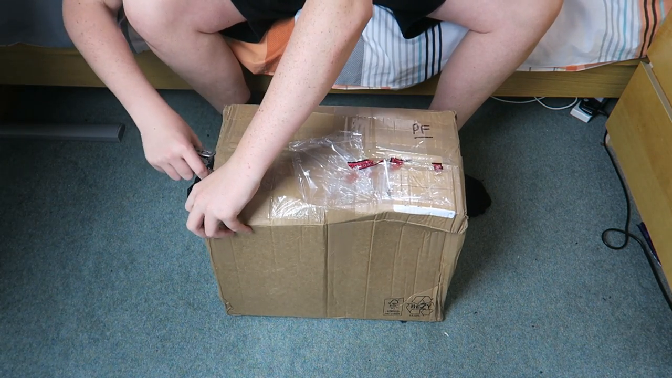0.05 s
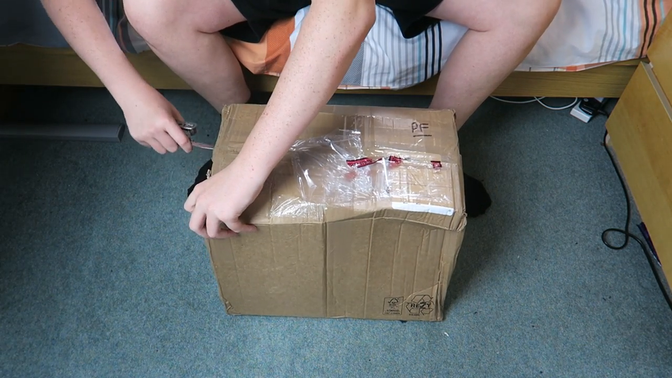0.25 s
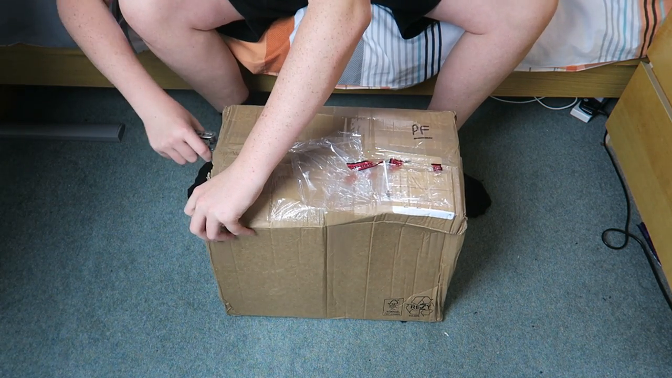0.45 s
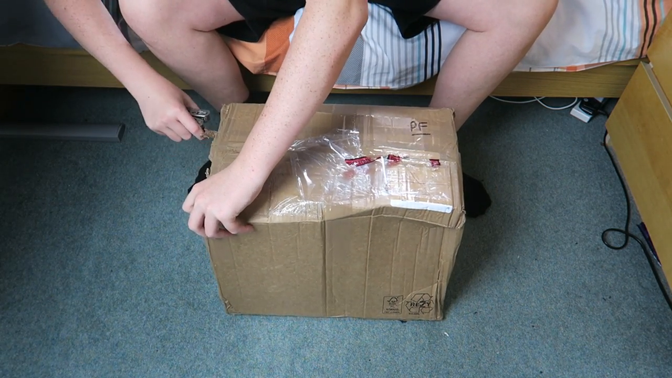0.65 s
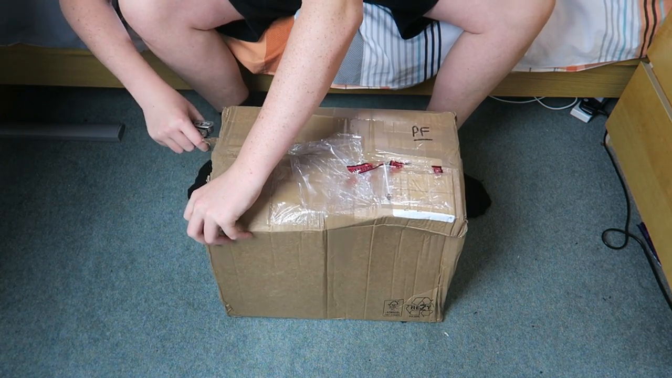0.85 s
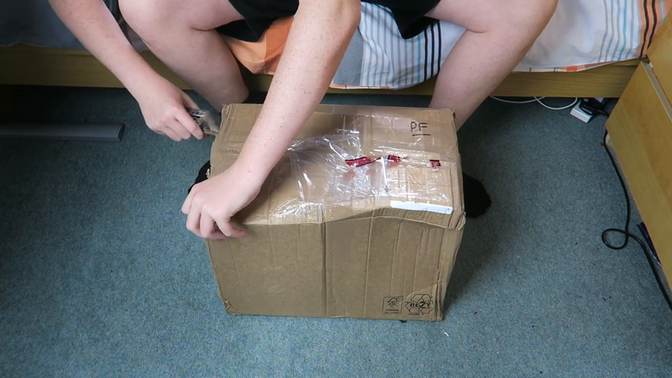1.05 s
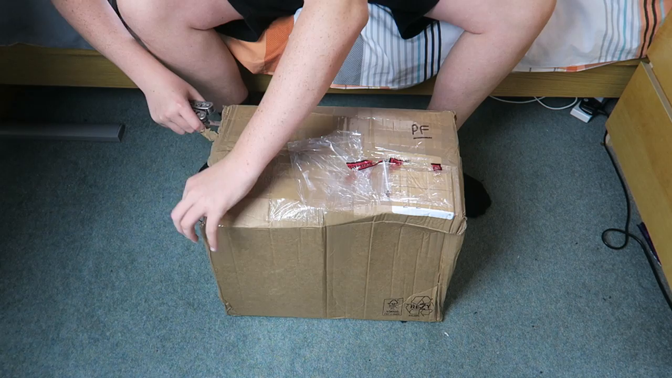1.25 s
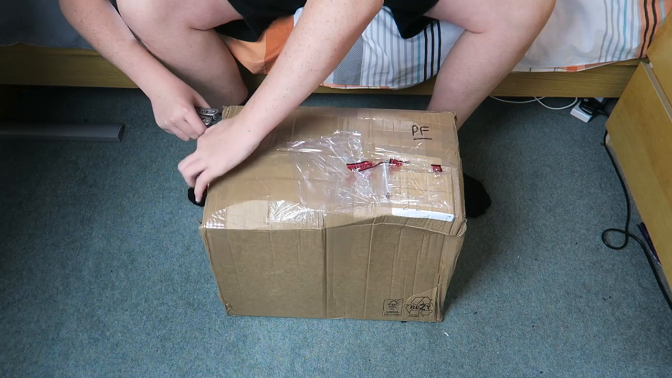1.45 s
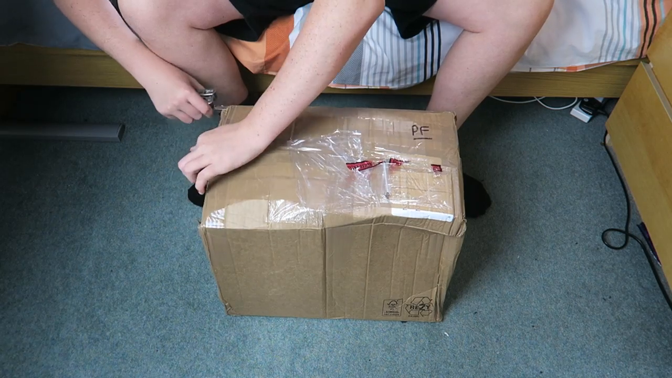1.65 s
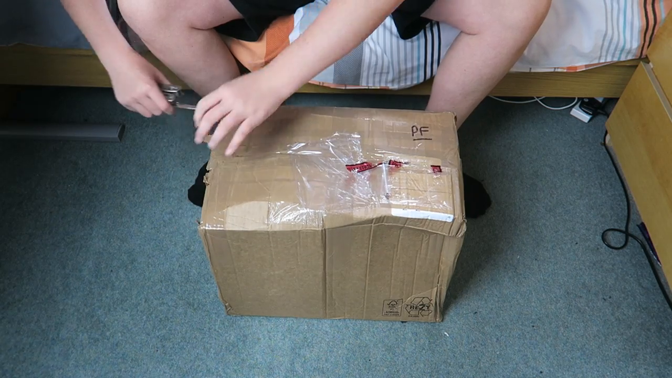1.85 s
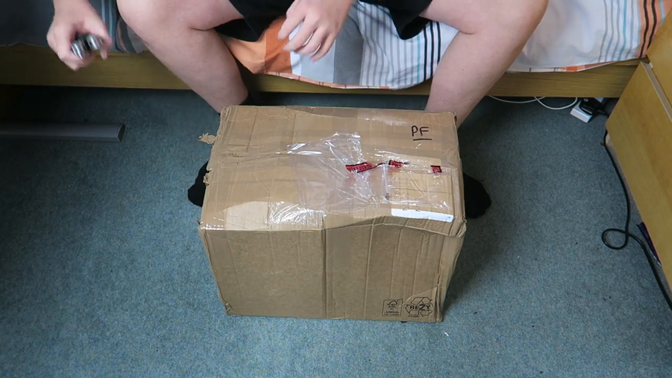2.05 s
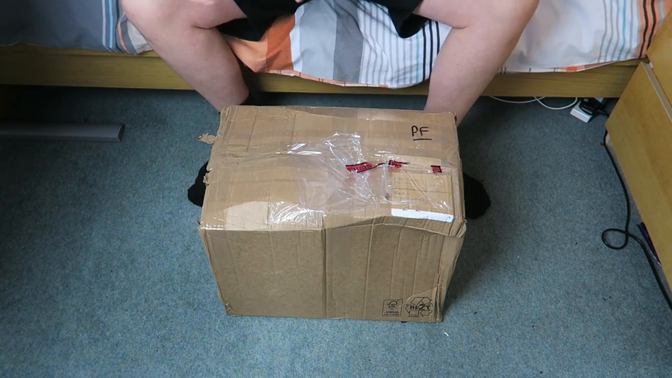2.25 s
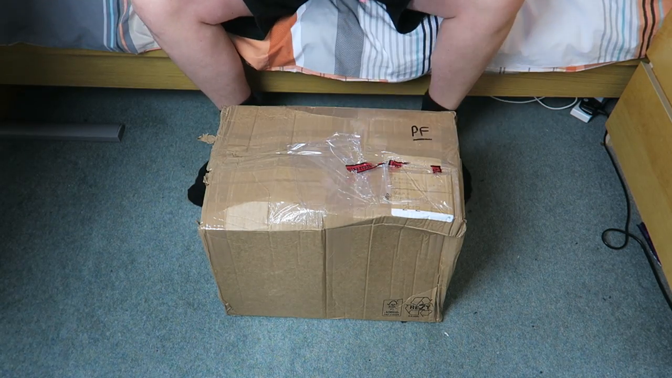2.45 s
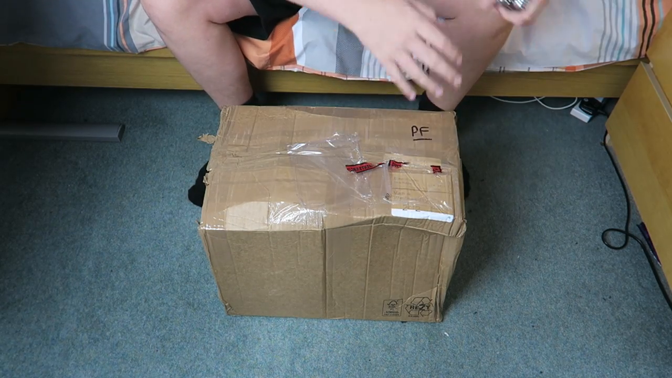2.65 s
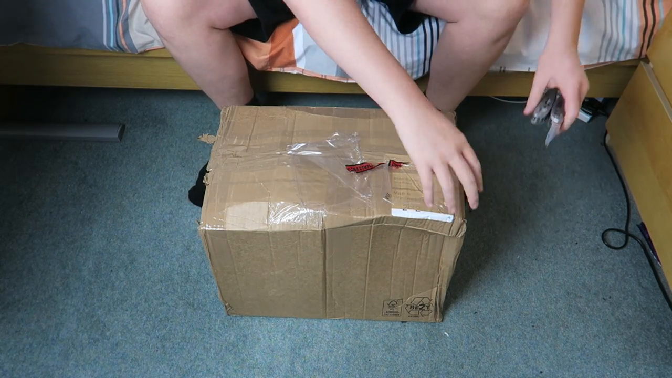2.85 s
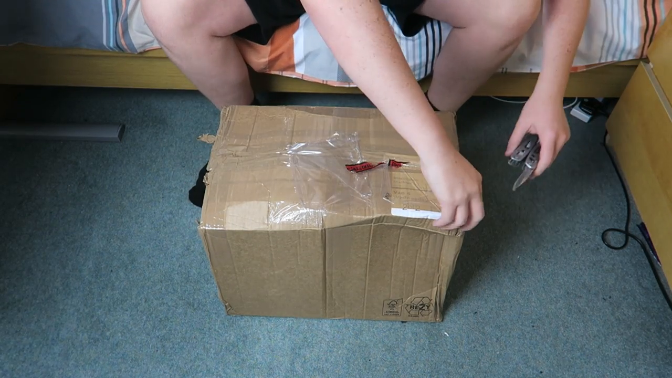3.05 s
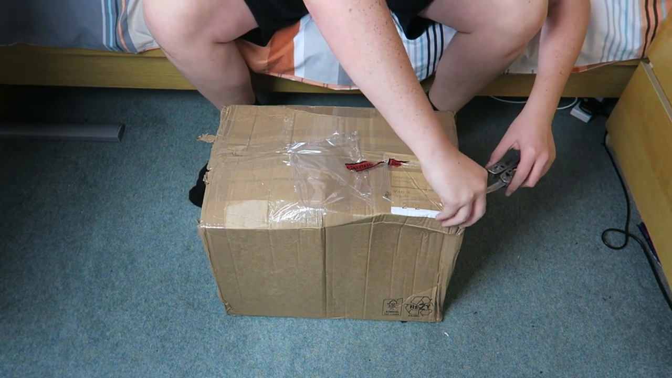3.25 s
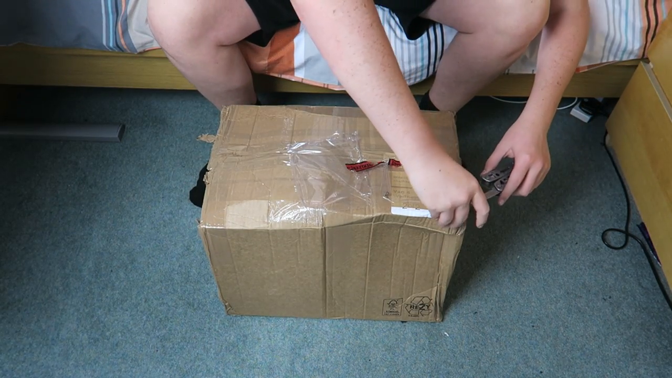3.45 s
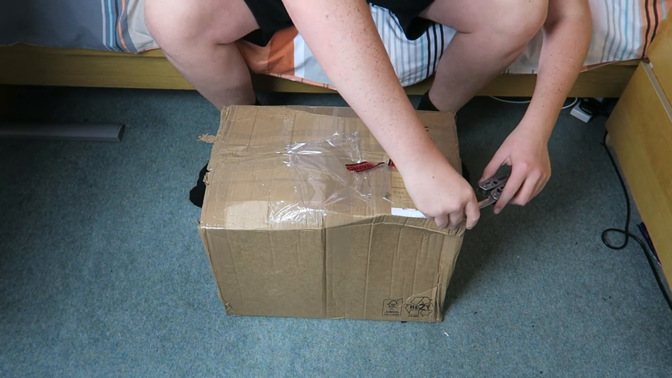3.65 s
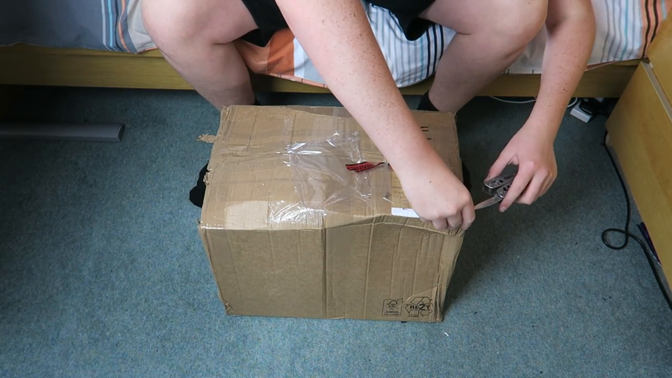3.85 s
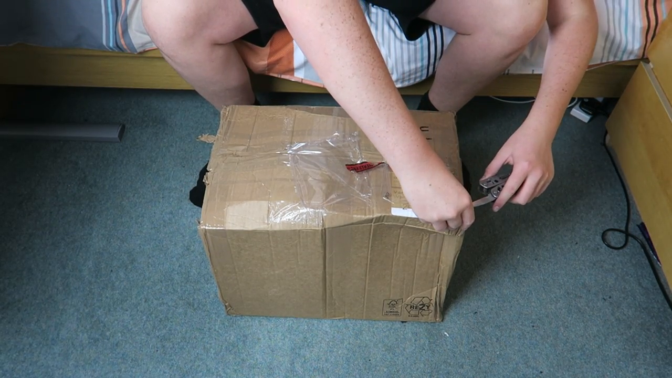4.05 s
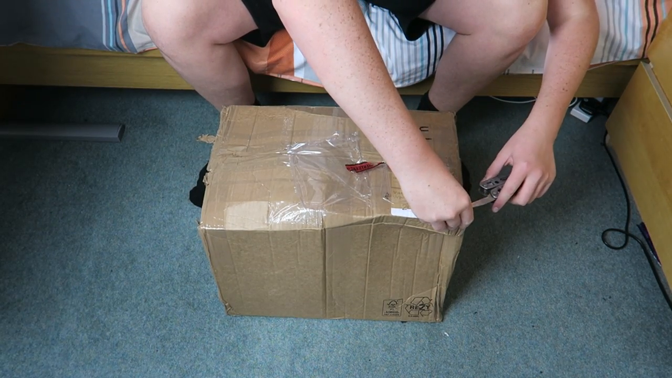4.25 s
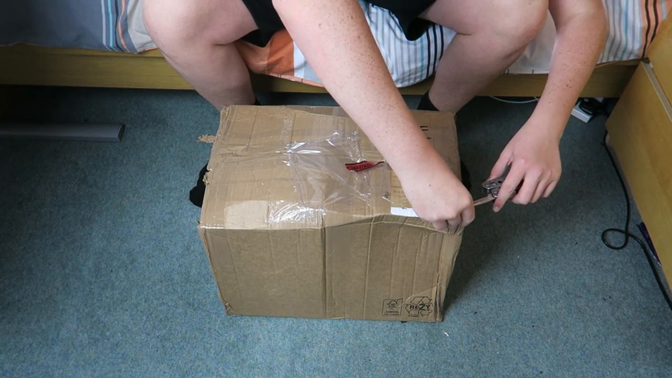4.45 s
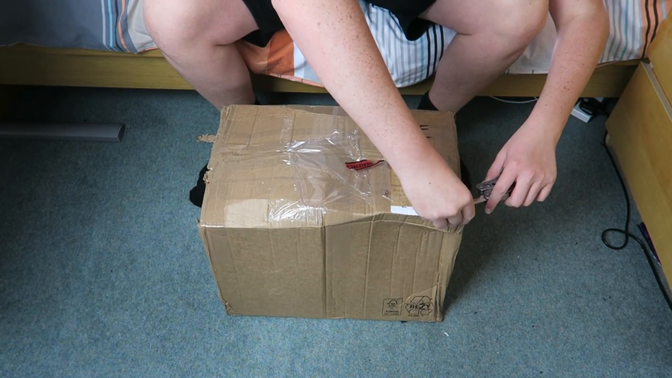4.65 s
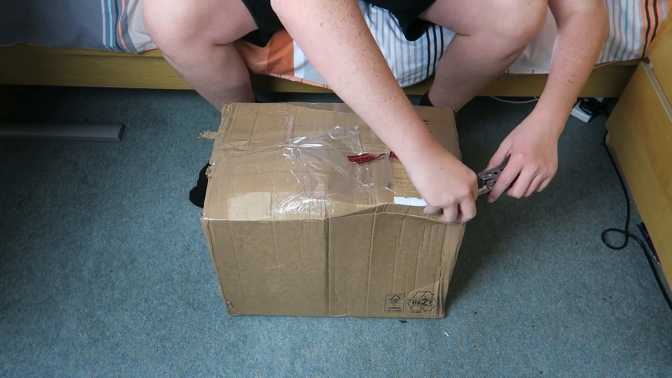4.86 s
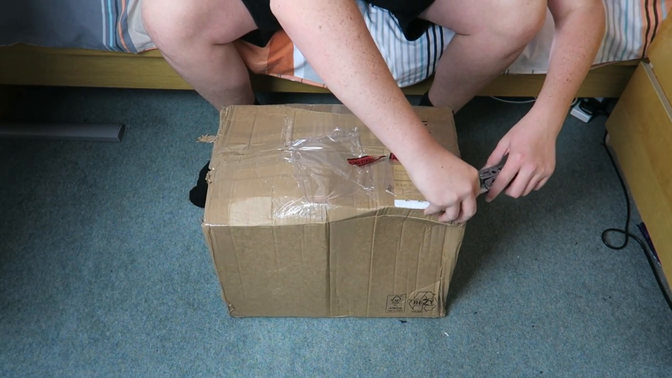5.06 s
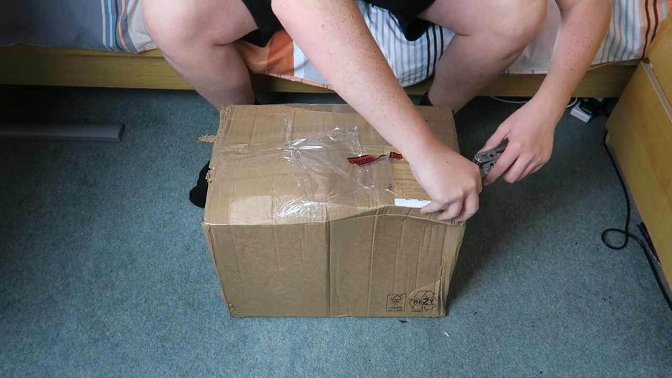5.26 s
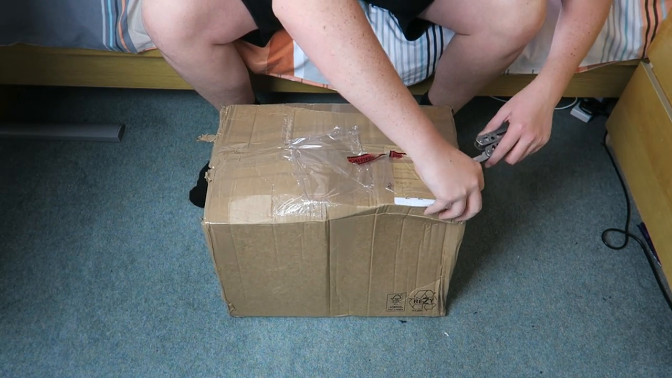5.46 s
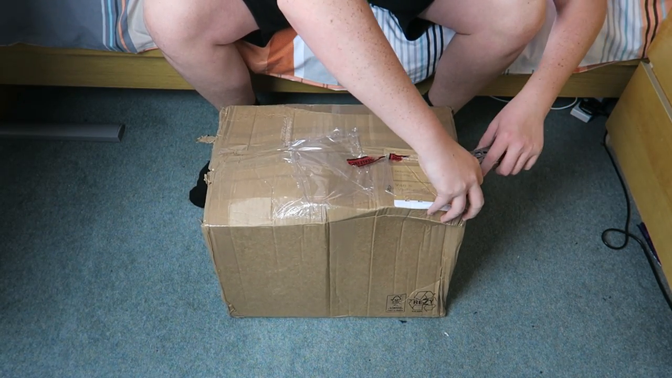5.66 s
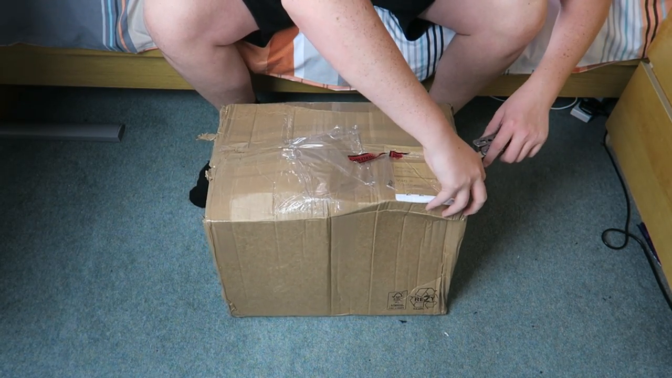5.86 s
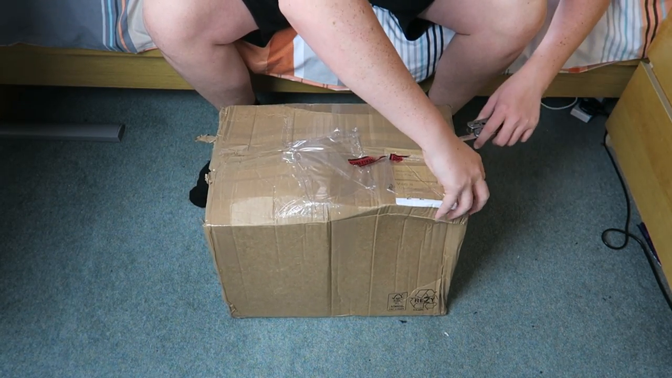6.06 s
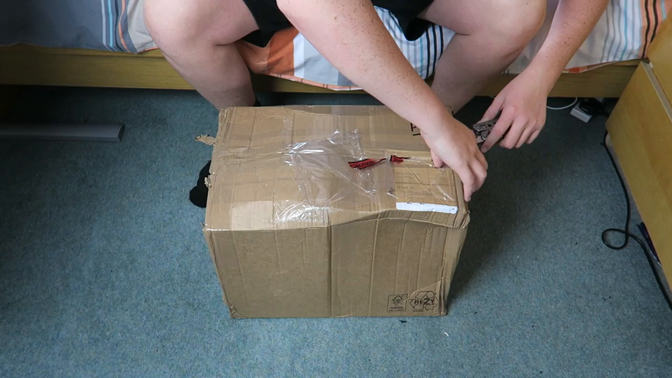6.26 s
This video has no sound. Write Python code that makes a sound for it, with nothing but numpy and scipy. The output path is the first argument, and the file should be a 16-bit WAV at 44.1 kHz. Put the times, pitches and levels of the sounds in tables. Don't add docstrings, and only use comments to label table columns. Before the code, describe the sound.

Dense ripping and popping of tape and cardboard for two seconds, with low hollow knocks from the box. It drops to near quiet, just faint rustles and light finger taps on the lid, until about four and a half seconds. Then cutting returns in separate scrapes, cracks and thuds, strongest near six seconds. Close stereo microphones, short dull room echo, soft hiss.

```python
import sys
import numpy as np
from scipy import signal
from scipy.fft import rfft, irfft, next_fast_len
from scipy.io import wavfile
from scipy.ndimage import uniform_filter1d, map_coordinates

SR = 44100
rng = np.random.default_rng(int(sys.argv[2]) if len(sys.argv) > 2 else 0)


def undo_db(level):
    steps = np.asarray(level, float) / 20
    return 10 ** steps


def wav_record(signal):
    frames = np.transpose(np.atleast_2d(signal))
    bounded = np.clip(frames, -1, 1)
    quanta = np.round(bounded * 32767).astype(np.int16)
    wavfile.write(sys.argv[1], SR, quanta)


N = 278712
CROSSING_S = 3

# [pitch_hz, level_db per Hz]
HISS_SUM = [(15, -38), (25, -7.5), (123, -3), (268, -5.5), (436, -4.5), (499, -6.5), (3670, -21),
            (9450, -35), (11100, -36.5), (15800, -62)]
# [pitch_hz, level_db per Hz]
HISS_DIFFERENCE = [(15, -58), (25, -22), (211, 3.5), (333, 5), (928, -6.5), (1350, -11), (4210, -21),
                   (11100, -34.5), (15800, -70)]
# [pitch_hz, side_db]
BASS_LEAN = [(60, -26), (130, -16), (250, -11.5), (420, -9), (490, -13), (530, -69)]
# [pitch_hz, lead_radians]
BASS_LEAD = [(130, 1.55), (250, 0.89), (420, .15)]
# [pitch_hz, side_db]
PORT_TREBLE = [(600, -38), (1500, -49), (3000, -30), (6500, -16), (9500, 0), (15000, -17)]
# [pitch_hz, side_db]
STRAY_SIDE = [(200, -40), (350, -13), (1000, -21.5), (2800, -24), (4000, -5.5), (7000, 1), (15000, 2.5)]
# [pitch_hz, level_db]
CAPSULE_TOP = [(13500, -2.5), (14800, -4), (15400, -16), (15860, -18), (15960, -56)]
# [pitch_hz, t60_s]
ROOM_DECAY = [(150, 0.17), (1500, 0.29), (10000, 0.24)]
# [pitch_hz, level_db]
ECHO_COLOUR = [(120, -19), (350, -3), (900, -2), (12000, 0.5)]
# [pitch_hz, width_hz, level_db]
CARPET_MODES = [(31, 6.5, 8), (77, 123, -2)]
# [start_s, hold_s, level_db]
BOX_SHOVES = [(0.0, 0.02, -35), (.3, .08, -37.5), (0.694, 0.04, -35), (1.07, .04, -47),
              (1.23, 0.039, -34.5), (1.464, 0.026, -39.5), (1.683, 0.15, -45), (2.4, .05, -58),
              (3.1, 0.057, -54), (4.607, 0.15, -44), (5.032, .04, -49), (5.346, 0.055, -54),
              (5.66, 0.067, -51), (6.07, 0.05, -27)]
# [start_s, peak_db, tone_hz]
FINGER_BUMPS = [(2.266, -37, 800), (2.691, -32, 594), (3.094, -36, 197), (3.394, -30.5, 180),
                (3.805, -32, 223), (3.843, -36.5, 216), (3.883, -38.5, 212), (4.094, -34.5, 440),
                (4.23, -42, 1050), (4.265, -36.5, 568), (1.069, -20, 210), (1.186, -14, 590),
                (4.574, -15, 310.4), (5.39, -22, 520), (5.58, -27, 494), (6.1, -14, 330),
                (6.222, -26.5, 215), (0.073, -18, 445), (1.919, -31, 397)]
# [centre_s, peak_db, pitch_hz, swell_s]
PANEL_POPS = [(.015, -17, 3000, .0009), (.073, -34, 2030, 0.0018), (.1845, -13, 2470, 0.00067),
              (0.2366, -20, 1620, 0.0012), (.295, -20.5, 442, 0.013), (.364, -19.5, 687, 0.0058),
              (0.701, -20.5, 238, 0.02), (.808, -33.5, 1190, 0.0027), (1.035, -16.5, 3010, 0.00085),
              (1.077, -21, 224, 0.007), (1.196, -16.5, 694, 0.0049), (1.1958, -14.5, 1270, 0.0022),
              (1.195, -17, 2870, 0.00088), (1.2142, -15.5, 2490, 0.0018), (1.231, -14, 221, 0.0086),
              (1.479, -29, 237, 0.011), (1.478, -30, 1155, .002), (1.65, -28, 630, .004),
              (1.919, -34, 830, .003), (3.847, -46, 910, .003), (4.5626, -22, 2250, 0.00093),
              (4.5645, -23, 690, .002), (4.576, -23, 3230, 0.0015), (4.5753, -23.5, 1830, .002),
              (4.58, -20, 249, 0.0027), (4.997, -36, 2020, .002), (3.814, -39, 215, 0.012),
              (5.336, -22, 1530, 0.0033), (5.362, -18.5, 215, 0.013), (5.357, -22, 2020, 0.0076),
              (5.5824, -21, 2110, 0.00082), (5.5817, -28, 2685, 0.001), (5.584, -31, 700, 0.0024),
              (5.596, -37, 484, .006), (5.9605, -21, 2180, 0.0018), (6.057, -18, 760, 0.0042),
              (6.074, -12.5, 218, 0.015), (6.075, -19.5, 750, 0.0064), (6.107, -22, 4200, .0005),
              (6.218, -37, 1960, 0.0023),
              (5.687, -29.5, 3030, 0.0014), (5.6855, -29, 2130, .001), (5.8445, -37, 5500, 0.0018),
              (5.8445, -37, 8100, 0.0018), (1.245, -24.5, 142, 0.023), (5.632, -35, 216, 0.012),
              (5.03, -30, 2000, 0.007), (4.712, -27.5, 145, 0.02), (6.5, -24, 215, 0.012),
              (5.317, -32, 3200, 0.0033), (3.402, -37, 200, 0.0068), (3.126, -39, 177, .007),
              (5.906, -28, 2250, .002), (5.936, -29, 2340, .002), (4.228, -50, 1080, .013),
              (3.312, -51, 1040, .022), (0.624, -27, 714, 0.014)]
# [centre_s, peak_db]
TIP_TICKS = [(0.175, -32), (0.1825, -33), (0.2907, -31), (0.5756, -41), (0.6469, -25), (0.7018, -24),
             (0.7084, -25), (0.7124, -17), (0.7184, -19), (0.856, -31), (0.8674, -28), (0.9333, -37),
             (1.0335, -40), (1.068, -36), (1.1094, -40), (1.1483, -23), (1.1544, -30), (1.8287, -31),
             (4.574, -37), (5.9035, -34), (6.0676, -30), (6.109, -27), (6.1823, -30), (6.2926, -44)]
# [start_s, peak_db, pitch_hz, swell_s, t60_s]
TAPE_SQUEAKS = [
    (1.517, -24, 2250, .003, .05),
    (1.867, -17, 2330, .0025, .16),
]
# [start_s, hold_s, pitch_hz, level_db]
PANEL_RASPS = [(0.0, 0.013, 860, -26), (0.005, 0.015, 1540, -39), (.285, 0.018, 480, -40),
               (.25, 0.15, 3110, -41), (.515, 0.013, 452, -29), (.69, 0.027, 1410, -32),
               (.857, 0.0045, 5230, -45), (1.04, 0.027, 2830, -50), (1.2, 0.02, 3220, -34.5),
               (1.5, 0.023, 2380, -38), (1.558, .008, 1755, -35), (1.66, 0.017, 1750, -38),
               (1.66, 0.043, 4630, -47), (1.706, 0.01, 2380, -25), (1.712, 0.016, 3010, -30.5),
               (1.83, .008, 3120, -42), (1.842, 0.022, 1590, -40), (1.872, .012, 2780, -42),
               (2.695, 0.022, 920, -59), (3.23, 0.095, 1040, -55), (3.244, .008, 2450, -51),
               (4.1, .02, 910, -63),
               (4.565, .004, 2100, -45), (4.567, 0.0039, 1300, -36), (4.578, 0.0089, 3370, -35),
                (4.58, .012, 1870, -37), (4.621, 0.14, 1338, -41.5), (4.65, 0.035, 1900, -41),
                (4.66, .09, 730, -40), (4.7, 0.033, 2250, -45), (4.897, .004, 1100, -43),
                (5.0, 0.026, 2010, -37), (5.008, 0.035, 1460, -41.5), (5.33, 0.11, 2130, -41),
                (5.586, .02, 2320, -47), (5.585, 0.034, 548, -36), (5.32, .13, 3220, -36.5),
                (5.843, .005, 5540, -43), (5.843, .005, 7950, -40.5), (5.88, 0.028, 461, -38.5),
                (5.908, .008, 2700, -46), (5.938, .012, 2600, -44), (5.96, 0.074, 2210, -32),
                (5.96, .08, 2700, -44), (6.055, 0.019, 3100, -30), (6.06, 0.044, 2060, -43),
                (6.215, 0.0063, 1900, -39), (6.255, 0.037, 1050, -51)]
# [start_s, hold_s, pitch_hz, level_db]
FILM_CRUMPLES = [(0.0, .03, 11600, -42), (.176, 0.009, 11000, -49), (.291, .004, 10500, -40),
                 (2.202, 0.018, 4700, -58), (2.27, 0.019, 2500, -67), (2.45, 0.12, 2900, -56),
                 (2.776, .004, 5200, -65), (1.148, 0.012, 9100, -45.5), (1.545, 0.025, 2880, -36.5),
                 (3.12, 0.035, 5460, -55.5), (3.161, 0.016, 4900, -45), (3.387, .002, 2800, -54),
                 (3.427, .003, 4500, -53), (3.462, 0.017, 3400, -50.5), (3.466, 0.022, 7000, -59),
                 (3.611, 0.022, 3700, -52.5), (5.625, .015, 8000, -50), (6.108, .004, 5130, -32),
                 (6.183, 0.015, 6430, -41.5)]
# [start_s, peak_db, tone_hz, thud_db re
TAPE_SNAPS = [(0.0145, -40, 1610, 2), (0.1007, -14, 1870, -6), (0.176, -16, 2820, -4),
              (0.183, -12.5, 2470, -17), (0.236, -10, 1610, 1), (0.2913, -23, 1780, 15),
              (0.362, -8.5, 1770, -22), (0.506, -42, 1550, 19), (0.577, -14.5, 1660, -24),
              (0.5957, -12, 2310, -3), (0.6478, -7.5, 1930, 3.5), (0.891, -27, 3130, -21),
              (1.032, -14.5, 2610, -24), (1.1931, -14, 1340, -25), (1.213, -13, 1220, 8),
              (1.2627, -22, 2180, -13), (1.342, -26.5, 2700, 3), (1.431, -28.5, 2530, -18),
              (1.5472, -23, 2310, -15), (1.5603, -27, 1760, -18), (1.6477, -20, 2300, 7),
              (1.6819, -12, 2300, -11), (1.708, -11.5, 2370, -30), (1.8476, -15, 2180, -18),
              (1.919, -24.5, 1260, 3), (1.9808, -35.5, 2500, -23),
              (2.364, -37, 2570, -16), (2.397, -37, 2660, -20), (3.245, -42, 2430, -17),
                (3.393, -34.5, 1190, 11), (3.462, -28.5, 3240, -24), (3.6125, -39, 3500, -20),
                (4.478, -36.5, 2090, 6), (4.5615, -36, 2130, 1), (4.5625, -30, 755, -15),
                (4.5743, -18.5, 3120, 0.5), (4.815, -30.5, 1605, -29), (4.8791, -31.5, 1500, 15),
                (4.998, -27, 2075, -18), (5.027, -21.5, 2020, -12), (5.1657, -43, 2260, -12),
                (5.3083, -40, 1580, -8), (5.5816, -24.5, 2550, 2), (5.581, -25, 1890, -29),
                (5.684, -29, 2300, -15), (5.878, -20.5, 1580, 9.5), (5.936, -29, 2110, 11),
                (5.9597, -23, 2210, 13), (6.056, -9, 1960, -12), (6.1086, -13, 1510, 6)]
# [start_s, peak_db, tone_hz, thud_db re peak]
BRIGHT_SNAPS = [(0.8564, -23, 2400, 2), (0.8674, -44, 2160, -18), (1.069, -25.5, 2100, -14),
                (1.152, -22, 2150, -7), (1.829, -21, 2650, -15), (2.203, -40, 3273, -16),
                (2.661, -44, 3520, -6), (2.748, -54, 3800, -10), (2.777, -55, 3800, -11),
                (2.813, -45, 3800, -13), (3.12, -34, 1910, 7.5), (3.1619, -30, 3820, -9),
                (5.623, -30.5, 2160, 10), (5.8427, -25, 2670, -13), (5.906, -20, 2250, -19),
                (6.185, -28, 1930, -8)]
# [pitch_hz, width_hz, level_db]
HOLLOW_MODES = [(105, 98, -20.5), (142.6, 14.5, 1), (224.8, 25.9, 2)]
# [pitch_hz, width_hz, level_db]
FLAP_MODES = [(310, 30, -5.5), (399, 33, 2), (439.8, 19.3, 7.5), (544.7, 22.5, 4.5), (614, 39, 1),
              (748, 62, -1.5), (878, 40, -7), (1050, 19, -4)]
# [pitch_hz, width_hz, level_db]
BLADE_MODE = [(2180, 300, -3)]
# [pitch_hz, level_db per Hz]
TEAR_COLOUR = [(500, -8.5), (750, 2.5), (1300, 5), (2200, 3), (3100, -2.5), (3800, -12), (5000, -13),
               (7000, -25.5)]
# [pitch_hz, level_db per Hz]
FIZZ_COLOUR = [(2500, -8.5), (4000, -4), (6000, -9.5), (9000, -16.5), (12500, -16), (14500, -27),
               (16000, -40)]
# [start_s, hold_s, tearing_db, box_weight_db, film_db]
BLADE_JABS = [(0.0, 0.01, -24, 2.5, -8), (.175, 0.0085, -32.5, -11, -9), (.2365, 0.0096, -25.5, -2, -13),
              (.645, 0.034, -32, 10, -6.5), (.856, 0.05, -43.5, -1, 0), (1.032, 0.022, -39.5, 3.5, -25),
              (1.195, 0.024, -26.5, 4.5, -9.5), (1.62, 0.024, -36.5, 6.5, -26),
              (1.828, 0.048, -34, -6.5, -15), (4.562, 0.027, -37, 4.5, -7), (4.88, 0.021, -46, 6, -11),
              (5.165, 0.06, -41.5, 1, -10), (5.305, 0.022, -31.5, 1.5, -12.5), (5.333, 0.06, -28, 4, -5),
              (5.58, 0.091, -45.5, -2, -6), (5.684, 0.08, -43, -2.5, -12), (5.843, 0.012, -46, -17, 10),
              (5.879, 0.19, -51.5, -15, 9.5), (6.053, 0.053, -24.5, 3.5, -9.5), (6.18, 0.01, -47, 9.5, 3)]
# [start_s, hold_s, tearing_db, box_weight_db, film_db]
BLADE_DRAWS = [(0.0, 1.9, -55, -1, -22), (.05, 0.13, -37, 0.5, -8.5), (.28, 0.097, -29, 7, -12),
               (.51, 0.083, -39.5, 4.5, -13), (.685, 0.034, -24, 4.5, -10), (.92, 0.046, -41, 5.5, -25),
               (1.07, 0.12, -40, 6, -6), (1.25, 0.045, -43.5, 10.5, -12), (1.46, 0.032, -43, 10.5, -25),
               (1.53, 0.035, -39, -5, -6.5), (1.67, 0.073, -31, 3.5, -19), (1.77, 0.044, -39, 6.5, -12.5),
               (1.91, 0.0063, -47.5, 7.5, -1.5), (4.64, 0.092, -36, 1.5, -10),
               (4.93, 0.008, -46.5, -22, -23), (5.005, 0.034, -38.5, 5, -5.5), (5.42, 0.034, -28, 1, -14),
               (1.35, 0.053, -42.5, -1, -9), (.44, 0.043, -44, 9.5, -28), (.78, 0.09, -45.5, 5, -29),
               (5.5, 0.0058, -39.5, 6, -25), (5.972, 0.063, -30.5, 4, -17), (6.22, 0.065, -48, 8, -3.5)]
# [start_s, hold_s, tearing_db, box_weight_db, film_db]
HAND_BRUSHES = [(2.2, .01, -63, -7, -3), (2.27, 0.018, -62.5, 7, -10), (2.38, 0.055, -53.5, -27, -11),
                (2.45, 0.15, -45.5, -7.5, -15), (2.74, 0.093, -60.5, 3.5, -8), (2.93, 0.13, -59.5, -5, -10),
                (3.11, 0.086, -53, 7.5, -10), (3.25, 0.039, -53.5, 5.5, -15),
                (3.395, 0.0093, -51.5, 4, -14), (3.463, 0.049, -53.5, 1, -4), (3.55, 0.18, -55, -5.5, -9.5),
                (3.72, 0.036, -56.5, 9, -14), (3.8, 0.071, -57.5, 10, -24), (4.1, 0.034, -57.5, 6, -25),
                (4.44, 0.051, -59.5, 4.5, -12)]


def unit(x):
    return x / np.sqrt(np.mean(x ** 2) + 1e-20)


def along(points, hz):
    f, v = np.transpose(points)
    return np.interp(np.log(hz + 1), np.log(f + 1), v)


def wobble(rate):
    knots = rng.standard_normal(int(N * rate / SR) + 4)
    return map_coordinates(knots, [np.arange(N) * rate / SR])


def filtered(x, response):
    m = next_fast_len(N + SR // 2)
    return irfft(rfft(x, m) * response(np.fft.rfftfreq(m, 1 / SR)), m)[..., :N]


def colour(points):
    return lambda hz: undo_db(along(points, hz))


def modes(rows):
    def response(f):
        total = 0
        for k, (hz, width, db) in enumerate(rows):
            total = total + (-1) ** k * undo_db(db) * 1j * f * width / (hz * hz - f * f + 1j * f * width)
        return total
    return response


def burst(hz, spread, fade):
    band = signal.butter(2, [hz / spread, hz * spread], "band", fs=SR)
    x = signal.lfilter(*band, fade * rng.standard_normal(len(fade)))
    return x / abs(x).max()


def gesture(start, hold, rise_db_s, fall_db_s):
    t = np.arange(0, N, 16) / SR
    rise, fall = rise_db_s * (t - start), fall_db_s * (start + hold - t)
    return undo_db(2 * np.minimum(0, np.minimum(rise, fall)))


def summed_db(power):
    return np.interp(np.arange(N), np.arange(0, N, 16), 10 * np.log10(power + 1e-9))


def floor():
    a, b = rng.standard_normal((2, N))
    mid = undo_db(-53 + 0.6 * wobble(12.1)) * unit(filtered(a, colour(HISS_SUM)))
    drift = 2.2 * wobble(45)
    whine = undo_db(-81.5) * unit(np.sin(2 * np.pi * 10850 * np.arange(N) / SR + drift))
    return mid + whine, undo_db(-48.5) * unit(filtered(b, colour(HISS_DIFFERENCE)))


def room(x):
    hz, t, z = signal.stft(rng.standard_normal(SR // 2), SR, nperseg=256)
    decay = undo_db(-60 * t / along(ROOM_DECAY, hz)[:, None])
    tail = signal.istft(z * decay, SR, nperseg=256)[1]
    return signal.fftconvolve(x, tail / np.linalg.norm(tail))[:N]


def unrelated(x):
    z = signal.stft(x, nperseg=128)[2]
    return signal.istft(z * np.exp(2j * np.pi * rng.random(z.shape)), nperseg=128)[1][:N]


def rocking():
    power = undo_db(2 * -67)
    for s, hold, db in BOX_SHOVES:
        power = power + undo_db(2 * db) * gesture(s, hold, rise_db_s=168, fall_db_s=152)
    return undo_db(summed_db(power)) * unit(filtered(rng.standard_normal(N), modes(CARPET_MODES)))


def bumps():
    out, t = np.zeros(N + SR), np.arange(SR // 5) / SR
    fade = (1 - np.exp(-t / 0.00087)) * undo_db(-60 * t / 0.12)
    for s, db, hz in FINGER_BUMPS:
        out[round(s * SR):][:len(t)] += undo_db(db - 4) * burst(hz, 1.7, fade)
    return out[:N]


def pops():
    out, t = np.zeros(N + SR), np.arange(-SR // 20, SR // 20) / SR
    ticks = [(s, db, 11800, .00002) for s, db in TIP_TICKS]
    for s, db, hz, swell in PANEL_POPS + ticks:
        shape = np.exp(-(t / (swell + 1e-4) / np.where(t > 0, 1.23, 1)) ** 2)
        out[round(s * SR):][:len(t)] += undo_db(db) * shape * np.cos(2 * np.pi * hz * t)
    return out[SR // 20:][:N]


def squeaks():
    t, out = np.arange(N) / SR, 0
    for s, db, hz, swell, t60 in TAPE_SQUEAKS:
        ring = (t > s) * undo_db(-60 * abs(t - s) / t60 + 1.5 * wobble(147))
        shape = np.exp(-((t - s) / swell) ** 2) + 0.3 * ring
        out = out + undo_db(db) * shape * np.sin(2 * np.pi * hz * t)
    return out


def rasps():
    out, t = np.zeros(N + SR), np.arange(SR // 4) / SR
    lead_s = .004
    for rows, spread in ((PANEL_RASPS, 1.041), (FILM_CRUMPLES, 1.28)):
        for s, hold, hz, db in rows:
            grit = undo_db(5.5 * np.repeat(rng.standard_normal(len(t) // 45), 45))
            rise, fall = 4000 * (t - lead_s), 900 * (lead_s + hold - t)
            shape = undo_db(np.minimum(0, np.minimum(rise, fall)))
            out[round(s * SR):][:len(t)] += shape * undo_db(db) * unit(burst(hz, spread, grit))
    return out[round(.003 * SR):][:N]


def snaps():
    out, push, t = np.zeros(N + SR), np.zeros(N), np.arange(SR // 5) / SR
    fade = (1 - np.exp(-t / .0005)) * undo_db(-60 * t / .018) + .2 * undo_db(-60 * t / .24)
    for rows, edge_db in ((TAPE_SNAPS, -28), (BRIGHT_SNAPS, -10.5)):
        for s, db, hz, thud_db in rows:
            crack, edge = burst(hz, 1.3, fade), burst(9000, 1.6, fade)
            ring = .6 * undo_db(-60 * t / .02) * np.sin(2 * np.pi * hz * t)
            out[round(s * SR):][:len(t)] += undo_db(db - 4) * (ring + crack + undo_db(edge_db + 5) * edge)
            push[round(s * SR)] = undo_db(db + thud_db + 26)
    return out[:N] + filtered(push, lambda f: modes(HOLLOW_MODES[1:])(f) + 0.78 * modes(FLAP_MODES)(f))


def crackle(count, centre_hz, cycles, spread_db):
    when, size = rng.random((2, count))
    scatter = rng.standard_normal((count, 1)).clip(-2.5, 1.5)
    hz, t = centre_hz * np.exp(.36 * scatter), np.arange(160) / SR
    level = undo_db(-spread_db * np.log(size + 0.11))[:, None]
    fade = (1 - np.exp(-3 * hz * t)) * np.exp(-hz * t / cycles)
    tones = level * fade * np.sin(2 * np.pi * hz * t)
    at = (when * N).astype(int)[:, None] + np.arange(len(t))
    return unit(np.bincount(at.ravel(), tones.ravel(), N + len(t))[:N])


def fibres(spread_db, clump_db, patchy_db):
    size_db = spread_db * np.minimum(rng.exponential(size=N), 4)
    size_db = size_db + clump_db * (wobble(45) + 1.4 * wobble(260))
    z = signal.stft(undo_db(size_db) * rng.standard_normal(N), nperseg=256)[2]
    field = uniform_filter1d(rng.standard_normal(z.shape), size=3, axis=0)
    field = uniform_filter1d(field, size=7, axis=1)
    return unit(signal.istft(z * undo_db(patchy_db * unit(field)), nperseg=256)[1][:N])


def efforts():
    tear = boom = flaps = fizz = 0
    for rows, rise_db_s in ((BLADE_JABS, 3500), (BLADE_DRAWS, 249), (HAND_BRUSHES, 326)):
        for s, hold, db, weight_db, film_db in rows:
            board = undo_db(2 * db) * gesture(s, hold, rise_db_s, fall_db_s=347)
            flap_db = -1.5 + 0.6 * weight_db - (s > CROSSING_S)
            tear = tear + board
            boom = boom + undo_db(2 * weight_db) * board
            flaps = flaps + undo_db(2 * flap_db) * board
            fizz = fizz + undo_db(2 * (db + film_db)) * gesture(s, hold, rise_db_s, fall_db_s=218)
    tear_db = summed_db(tear)
    return tear_db, summed_db(boom) - tear_db, summed_db(flaps) - tear_db, summed_db(fizz) - tear_db


def strokes():
    tear_db, boom_db, flap_db, fizz_db = efforts()
    board = fibres(spread_db=2.8, clump_db=1.3, patchy_db=3.4)
    film = fibres(spread_db=3, clump_db=2.3, patchy_db=2.5)

    def part(x, db, response):
        return filtered(undo_db(tear_db + db) * x, response) / np.std(filtered(x, response))

    def edge(f):
        return colour(TEAR_COLOUR)(f) * undo_db(0.59 * np.sin(f / 47 + 3 * np.sin(f / 310)))

    swell = abs(uniform_filter1d(unit(filtered(board, modes(HOLLOW_MODES))) ** 2, size=2600)) + .1
    push = board / swell ** .4
    held = [(hz, width, 0.44 * db) for hz, width, db in FLAP_MODES]
    left, right = part(board, flap_db, modes(FLAP_MODES)), part(board, flap_db, modes(held))
    box = part(push, boom_db, modes(HOLLOW_MODES)) + np.where(np.arange(N) < CROSSING_S * SR, left, right)
    box = box + part(board, 0, edge) + part(film, -15.5, modes(BLADE_MODE))
    glue = crackle(count=4000, centre_hz=2200, cycles=2.2, spread_db=4.5)
    firm_db = np.minimum(0, 0.43 * (tear_db + 37.5))
    return box + undo_db(tear_db + firm_db - 3) * glue + part(film, fizz_db, colour(FIZZ_COLOUR))


def scene():
    t = np.arange(N) / SR
    box = strokes() + snaps() + bumps() + rasps()
    echo = undo_db(-6) * room(filtered(box, colour(ECHO_COLOUR)))
    mid = box + squeaks() + pops() + echo + rocking()
    mid = mid - .25 * (t > CROSSING_S) * filtered(mid, lambda hz: hz > 13300)
    lean = filtered(mid, lambda hz: colour(BASS_LEAN)(hz) * np.exp(1j * along(BASS_LEAD, hz)))
    ports = np.tanh(2 * (CROSSING_S - t)) * filtered(mid, lambda hz: 1j * colour(PORT_TREBLE)(hz))
    side = lean + ports + filtered(unrelated(mid), colour(STRAY_SIDE))
    hiss, hiss_side = floor()
    return np.array([mid + hiss + side + hiss_side, mid + hiss - side - hiss_side])


def low_pass(x):
    return signal.sosfilt(signal.butter(12, 15920, fs=SR, output="sos"), x)


def record(dry):
    def treble_gain(hz):
        return undo_db(along(CAPSULE_TOP, hz) - 14 * np.exp(-((hz - 13050) / 150) ** 2))

    return low_pass(filtered(dry, treble_gain))


dry = scene()
out = record(dry)
wav_record(out)
```